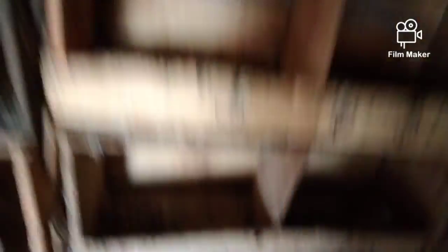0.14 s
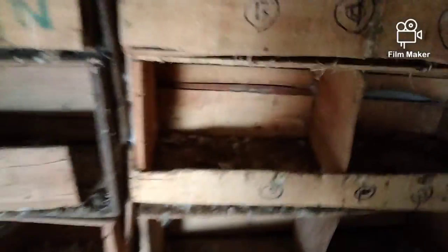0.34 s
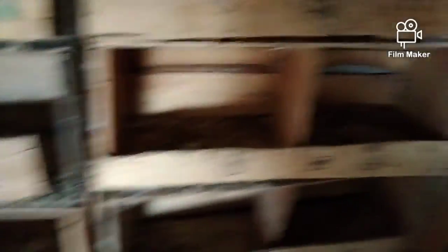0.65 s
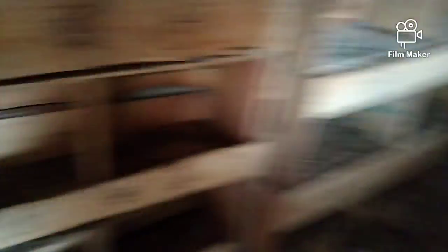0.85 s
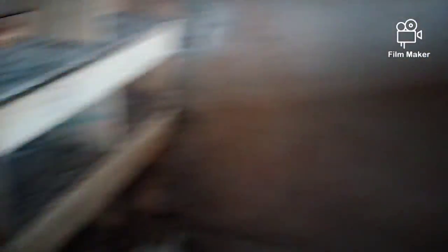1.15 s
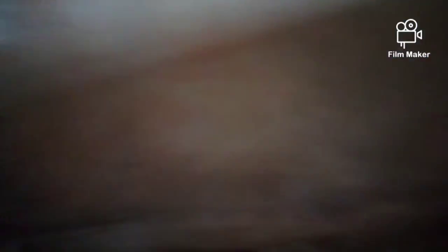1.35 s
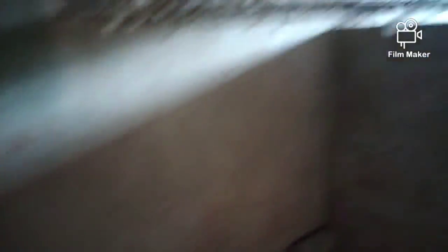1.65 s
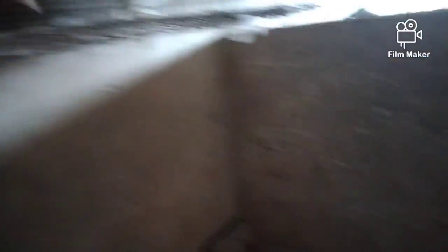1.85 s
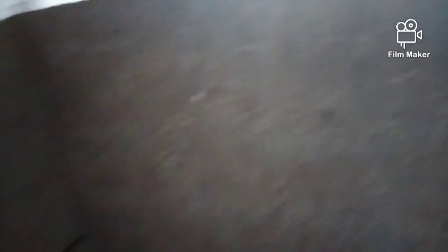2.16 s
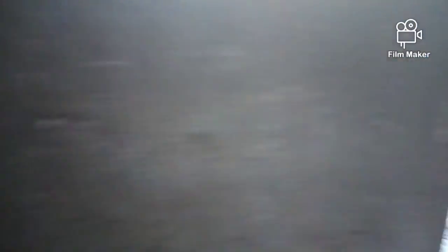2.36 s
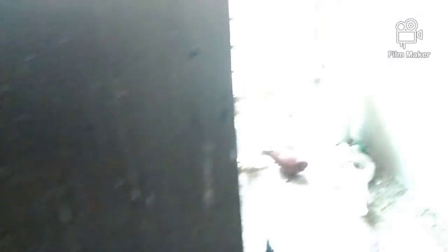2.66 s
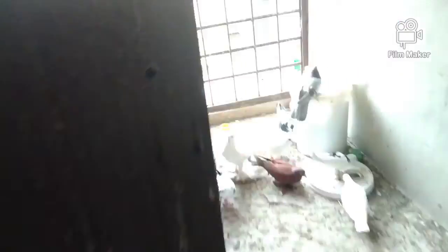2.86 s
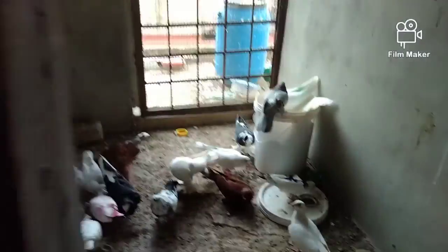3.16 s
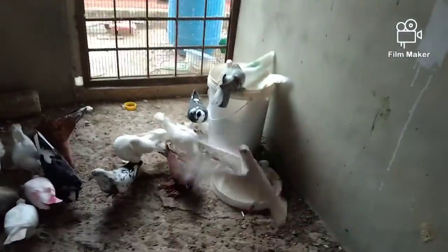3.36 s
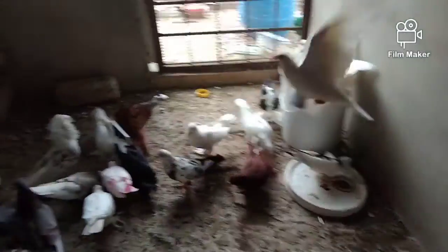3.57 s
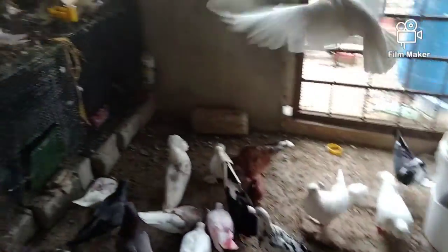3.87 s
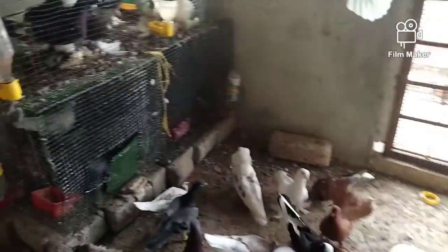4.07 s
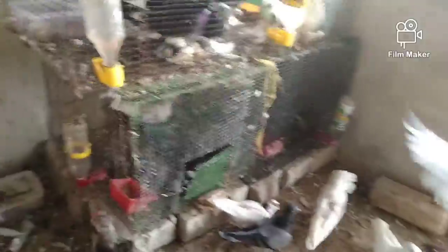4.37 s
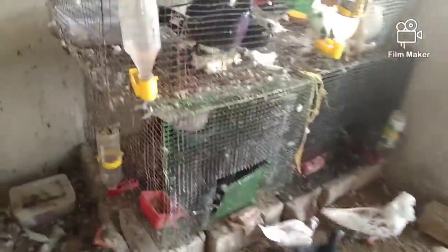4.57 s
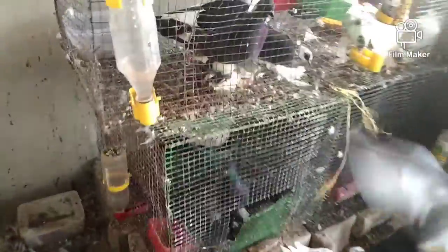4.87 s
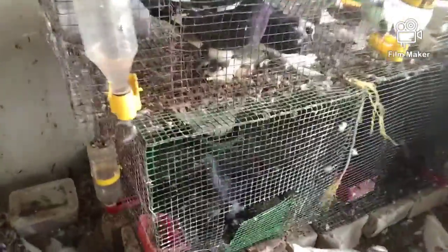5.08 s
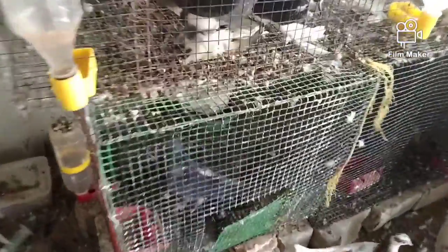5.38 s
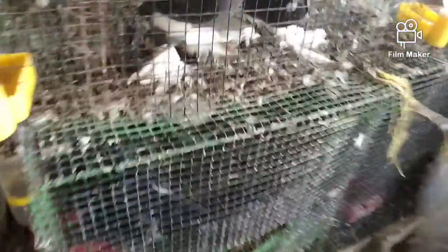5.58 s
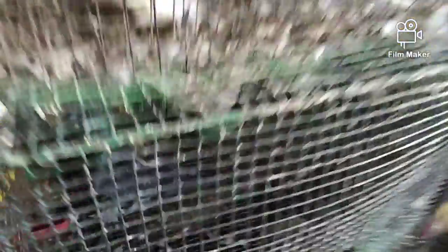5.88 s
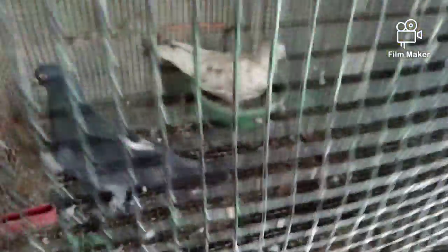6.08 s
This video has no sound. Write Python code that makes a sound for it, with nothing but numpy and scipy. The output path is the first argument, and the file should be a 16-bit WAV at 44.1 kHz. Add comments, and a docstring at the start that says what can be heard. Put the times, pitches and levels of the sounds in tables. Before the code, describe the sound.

It starts quietly, with high peeps and begging whistles from young pigeons, light wooden knocks, a few gritty footsteps and birds stirring in dry litter. Then the pigeons suddenly take off and keep fluttering around a wire-mesh cage, their sharp wing claps, low puffs of air and feather swishes very close to the microphone. Brief chirps and faint coos come through, all with the short echo of a small concrete room.

```python
"""Pigeons' wings clap, push air and rustle close to the microphone, in a small concrete loft. The walk in is
quiet: young birds peep and whistle, shoes scuff on grit, claws scrape, boards knock. At about 3.4 s the flock
takes fright and flutters around a wire-mesh cage, with peeps and two close coos in between. Bare walls close by
add a short reverberation; behind it all are faint coos, a low rumble and the shuffling of birds farther off.
One microphone, mono."""
import sys
import numpy as np
from scipy import signal
from scipy.fft import rfft, irfft
from scipy.io import wavfile
from scipy.ndimage import uniform_filter1d, map_coordinates

SR = 44100
rng = np.random.default_rng(int(sys.argv[2]) if len(sys.argv) > 2 else 0)


def pcm_store(signal):
    """Save signal as 16-bit PCM."""
    levels = np.round(np.clip(np.atleast_2d(signal), -1, 1) * 32767)
    wavfile.write(sys.argv[1], SR, levels.astype(np.int16).T)


N = 275184
TIME = np.arange(N) / SR

# wing claps around the microphone: t/s, level/dB, brightness/dB, contact/s
WING_CLAPS = [(3.388, -35, -8, 0.007), (3.5429, -11, 0, 0.0048), (3.9079, -30, 9, 0.01),
              (4.3148, -22.5, -2.5, 0.015), (4.4385, -15, -7, 0.0062), (4.5709, -20.5, 1.5, 0.012),
              (4.6053, -18, -9, 0.0068), (4.708, -20.5, 7, 0.0067), (4.7373, -21, -2, 0.0075),
              (4.867, -15, 0, 0.0078), (4.986, -28, -9, 0.0054), (5.102, -22.5, -9, .011),
              (5.4304, -20, -8, 0.0055), (5.5513, -9, 5, .0048), (5.565, -18, -5, 0.0104),
              (5.611, -16, -2, 0.012), (5.659, -22, -1, 0.0055), (5.7754, -9.5, -2.5, 0.0047),
              (5.818, -19, -7, .009), (6.027, -20.5, -1, 0.01), (6.132, -25, -1, 0.0075)]
# spectrum of a clap: f/Hz, level/dB
CLAP_SPECTRUM = [(120, -43), (250, -7), (700, -3), (1400, 1.5), (2200, 0), (3150, 3.5), (4000, 0),
                 (4900, -6), (7300, -0.5), (8600, -13), (11500, -10), (15800, -11)]
def claps(cup_hz=1370, quill_hz=3150, sharp_contact_s=0.005, brush_s=0.016):
    """Wing tips meet in a crack, the cupped air and then the quills ring, and the feathers brush apart."""
    out, far, t = np.zeros(N), np.zeros(N), TIME[:SR // 6]
    for start, db, bright_db, contact_s in WING_CLAPS:
        u = t / contact_s
        slap = (2 * u) ** 2 * np.exp(2 - 4 * u)
        brush = from_db(-15) * np.exp(-t / brush_s)
        burst = even_burst(slap + brush)
        dull = signal.sosfilt(signal.butter(1, 2500, fs=SR, output="sos"), burst)
        crack = dull * from_db(-bright_db / 4) + (burst - dull) * from_db(bright_db / 2)
        cup = from_db(-8.5 - bright_db) * ping(t - contact_s / 4, cup_hz)  # dull claps ring most
        quill = from_db(-6) * ping(t - contact_s / 2, quill_hz)
        clap = from_db(db - 7.5) * (crack + (cup + quill) * sharp_contact_s / contact_s)
        add(out, start, clap)
        add(far, start, clap * from_db(-0.3 * max(db + 20, 0)))  # louder claps are closer, so drier
    return colour(out - far + loft(far, wet_db=-1.5), CLAP_SPECTRUM)


def clap_puffs(delay_s=0.019, hz=193, q=2.9):
    """Air squeezed out between clapping wings reaches the microphone a moment later as a soft thump."""
    crests = [(start + delay_s, db - 25.5) for start, db, *_ in WING_CLAPS]
    level = swells(crests, attack_s=0.009, fade_db_per_s=170)
    return level * rms_one(resonate(resonate(rng.standard_normal(N), hz, q), hz, q))


# heavy downstrokes right at the microphone: crest t/s, level/dB, centre f/Hz, swell/s
HEAVY_STROKES = [(4.315, -32.5, 225, 0.014), (4.375, -27, 270, .014), (4.445, -28, 220, .016),
                 (4.61, -25.5, 298, 0.0055), (4.91, -28, 373, 0.015), (4.969, -26.5, 235, 0.016),
                 (5.57, -23.5, 297, 0.017), (5.723, -18, 222, 0.00712), (5.775, -26, 260, 0.0073),
                 (5.888, -22, 297, .012), (6.025, -29, 232, .01)]
def downstrokes(q=0.86):
    """A wing close by shoves the air: one broad, low whump that swells and is gone."""
    out, t = np.zeros(N), TIME[:SR // 6]
    for crest, db, hz, swell_s in HEAVY_STROKES:
        push = even_burst((t / swell_s) ** 2 * np.exp(-2 * t / swell_s))
        whump = resonate(resonate(push, hz, q), hz, q)
        add(out, crest - swell_s, from_db(db) * whump / np.abs(whump).max())
    return out


# how hard the flock flutters, as the level of its downdraught: t/s, level/dB
DOWNDRAUGHT = [(3.4, -45), (3.53, -43), (3.57, -45.5), (3.68, -47), (4.2, -47), (4.25, -39), (4.73, -39.5),
               (4.9, -33.5), (5.05, -39), (5.46, -38.5), (5.58, -35), (5.65, -35.5), (5.73, -32),
               (5.85, -35), (5.92, -34.5), (6.22, -40.5)]
TAKE_OFF_S, USUAL_FLURRY_DB = 3.378, -37.5
def aloft(db, follows, rise_s=0.02):
    """Gain of a flutter layer: silent until take-off, then following a share of the flurry's swing."""
    airborne = np.clip((TIME - TAKE_OFF_S) / rise_s, 0, 1)
    flurry = from_db(np.interp(TIME, *np.transpose(DOWNDRAUGHT)) - USUAL_FLURRY_DB)
    return airborne * from_db(db) * flurry ** follows


def wingbeats(beat_hz=8.0, stroke_decay=1.23, birds=3):
    """Birds beat out of step; each stroke starts sharply and fades. Power is even over 0.1 s."""
    power = 0.088  # floor between strokes
    for _ in range(birds):
        cycle = (rng.random() + np.cumsum(beat_hz * (1 + 0.2 * drift(3))) / SR) % 1
        stroke = np.minimum(cycle / 0.035, 1) * np.exp(-stroke_decay * cycle)
        power = power + stroke ** 2
    return np.sqrt(power / uniform_filter1d(power, SR // 10))


# single strong strokes near the microphone: crest t/s, level/dB, width/s
NEAR_STROKES = [(3.426, -38.5, 0.024), (3.506, -40, 0.0069), (3.698, -37, 0.0035), (3.768, -39, 0.0026),
                (3.815, -41, 0.017), (3.885, -43, .006), (4.236, -42, 0.054), (4.65, -37.5, 0.047),
                (5.181, -32.5, 0.0067), (5.237, -39.5, 0.017), (5.354, -30.5, 0.005), (5.711, -34, 0.023)]
# spectra of the pushed air and of the swish: f/Hz, level/dB
AIR_SPECTRUM = [(30, -24), (60, -10.5), (100, 2.5), (150, -5), (185, -3.5), (245, 4.5), (320, 1.5),
                (420, 0), (620, -0.5), (900, -10.5), (1500, -37.5)]
SWISH_SPECTRUM = [(400, -16), (700, 1.5), (1000, -2.5), (1450, 3.5), (2100, -2), (3100, 2), (3800, -7),
                  (4800, -15.5), (7000, -12.5)]
def flock():
    """The flock circles the cage: every stroke pushes a puff of air, swishes and rustles."""
    beats = wingbeats()
    near = sum(from_db(db) * np.exp(-.5 * ((TIME - crest) / width) ** 2)
               for crest, db, width in NEAR_STROKES)
    air_level = aloft(-39, follows=1) * beats * from_db(1.25 * drift(35))
    puffs = air_level * colour(rng.standard_normal(N), AIR_SPECTRUM)
    swish_level = np.hypot(aloft(-40, follows=0.7) * beats ** 1.75, near)
    swishes = swish_level * colour(grains(5000, spread_db=1.8, smooth=0.98), SWISH_SPECTRUM)
    return puffs + swishes + vanes(beats, near)


# feather tips flick against the cage wire: crest t/s, level/dB
WIRE_FLICKS = [(3.785, -44), (4.296, -35), (4.39, -40.5), (4.809, -39), (4.953, -39), (5.161, -36.5),
               (5.456, -37), (5.489, -39.5), (5.954, -42), (6.082, -39), (6.136, -44)]
# spectrum of rubbing feathers: f/Hz, level/dB
FEATHER_SPECTRUM = [(3000, -13.5), (5000, -5.5), (6500, -1), (7600, -0.5), (8400, -15.5), (9500, -5.5),
                    (11000, 2.5), (11800, 4.5), (12700, -6), (14000, -8), (15800, -2)]
def vanes(beats, near, approach_db_per_s=3.5):
    """Feather vanes crackle and squeak with the beats, louder as the microphone comes closer."""
    rustle = aloft(-49.5, follows=0.18) * from_db(approach_db_per_s * (TIME - TAKE_OFF_S))
    flicks = swells(WIRE_FLICKS, attack_s=0.0027, fade_db_per_s=455)
    level = np.sqrt(rustle ** 2 + (from_db(-8) * near) ** 2 + flicks ** 2)
    catches = .7 * scratches(per_s=55, swell_s=.006)
    crackle = grains(3500, spread_db=0.33, smooth=1.0) * beats ** 0.76
    return level * colour(crackle + catches, FEATHER_SPECTRUM)


def calls(notes, octaves_per_s, bend, lateness, octave_db, waver, waver_hz, rasp, wet_db):
    """Near-sine bird notes that sink and level out; the pitch waver eases from waver[0] to waver[1]."""
    out = np.zeros(N)
    for start, length, last_hz, db in notes:
        first_hz = last_hz * 2 ** min(octaves_per_s * length, 0.44)  # longer notes fall further
        u = np.linspace(0, 1, int(length * SR))
        glide_hz = last_hz + (first_hz - last_hz) * (1 - u) ** bend
        wobble = np.interp(u * length * waver_hz, np.arange(512), rng.standard_normal(512))
        hz = glide_hz * (1 + np.interp(u, [0, .7], waver) * wobble)
        phase = 2 * np.pi * np.cumsum(hz) / SR
        shape = np.sqrt(2 * np.abs(np.sin(np.pi * u ** lateness)))
        tone = np.sin(phase) + from_db(octave_db) * np.sin(2 * phase)
        add(out, start, from_db(db) * shape * tone)
    roughness = rms_one(1 + rasp * drift(waver_hz))
    return loft(out * roughness, wet_db)


# young birds around the loft: t/s, length/s, final f/Hz, level/dB
PEEP_NOTES = [(-.02, 0.052, 3170, -43), (.36, 0.052, 2750, -42.5), (.38, 0.043, 1597, -51.5),
              (.47, 0.026, 1153, -38), (.598, 0.049, 2776, -42.5), (.618, 0.02, 1870, -50),
              (1.25, 0.088, 2370, -51), (2.475, 0.046, 2950, -45.5), (2.512, 0.028, 2260, -45),
              (2.528, 0.045, 1380, -37), (2.655, 0.057, 2862, -44), (2.854, 0.053, 2820, -46),
              (2.884, 0.05, 1368, -42), (3.099, 0.048, 1275, -43.5), (3.9, .074, 2296, -39),
              (4.111, 0.075, 2170, -45), (4.392, 0.041, 3140, -38.5), (4.625, 0.036, 2047, -36),
              (5.078, 0.024, 2790, -37), (5.283, 0.026, 2300, -31.5), (5.372, 0.036, 2087, -34),
              (5.526, 0.025, 2790, -30.5)]
def peeps():
    """Each peep starts rough, drops steeply and steadies."""
    return calls(PEEP_NOTES, octaves_per_s=11, bend=2.5, lateness=2, octave_db=-23.5,
                 waver=(.04, .006), waver_hz=800, rasp=.35, wet_db=-0.5)


# whistles off the walls: t/s, length/s, final f/Hz, level/dB
WHISTLE_NOTES = [(-.01, 0.045, 4060, -47.5), (.19, 0.032, 2704, -49), (.343, .026, 3820, -49.5),
                 (.568, .034, 3860, -52.5), (1.098, 0.047, 1723, -56), (1.28, 0.12, 2234, -53.5),
                 (1.38, 0.103, 2077, -52.5), (1.365, 0.089, 4050, -49.5), (1.46, 0.052, 3460, -45.5),
                 (1.515, 0.068, 3820, -52.5)]
def whistles():
    """Short, nearly level notes that reach the microphone with more room than direct sound."""
    return calls(WHISTLE_NOTES, octaves_per_s=0.8, bend=1.76, lateness=0.5, octave_db=-20,
                 waver=(.016, .011), waver_hz=300, rasp=.35, wet_db=2)


# squeaks among the birds: t/s, length/s, final f/Hz, level/dB
SQUEAK_NOTES = [(2.303, 0.028, 3450, -38), (3.145, 0.054, 3530, -56.5), (5.268, 0.015, 3290, -32.5)]
def squeaks():
    """Brief high notes, hoarse from a fast flutter in pitch and level."""
    return calls(SQUEAK_NOTES, octaves_per_s=2.3, bend=4, lateness=0.7, octave_db=-38,
                 waver=(.04, .028), waver_hz=600, rasp=.5, wet_db=-4)


# squabs' long begging whistles, one curve each: t/s, f/Hz, level/dB
BEGGING_CURVES = [
    [(.85, 4480, -63), (.91, 4080, -51), (.945, 3724, -45), (1.0, 3710, -51), (1.04, 3720, -39.5),
     (1.09, 3650, -44), (1.12, 3490, -38.5), (1.19, 3430, -43.5), (1.25, 3645, -39.5), (1.3, 3460, -38),
     (1.35, 3430, -41.5)],
    [(1.01, 4180, -47), (1.05, 4116, -42.5), (1.1, 4153, -44), (1.15, 4170, -47), (1.22, 4210, -49),
     (1.27, 4010, -47), (1.33, 4210, -45)],
    [(1.37, 3330, -41), (1.41, 3365, -33), (1.43, 3270, -33), (1.49, 3150, -63), (1.53, 3054, -35),
     (1.58, 3060, -35.5), (1.595, 3100, -43)],
]
def begging(jitter=.007, rasp=.42, rasp_hz=360, break_db=3.5, break_hz=45):
    """Thin squab voices: the pitch trembles, the tone rasps and breaks, its octave fades as it sinks."""
    out = 0
    for curve in BEGGING_CURVES:
        times, hz, db = np.transpose(curve)
        pitch = np.interp(TIME, times, hz)
        phase = 2 * np.pi * np.cumsum(pitch * (1 + jitter * drift(rasp_hz))) / SR
        level = from_db(np.interp(TIME, times, db, left=-np.inf, right=-np.inf))
        roughness = rms_one((1 + rasp * drift(rasp_hz)) * from_db(break_db * drift(break_hz)))
        strain = np.minimum(pitch / 3700, 1) ** 11
        out = out + level * roughness * (np.sin(phase) + from_db(-14) * strain * np.sin(2 * phase))
    return loft(out, wet_db=-5)


# light knocks on wood and floor: t/s, level/dB, strongest f/Hz, attack/s
LIGHT_KNOCKS = [(.21, -32.5, 600, 0.01), (0.474, -25.5, 1390, 0.0039), (0.792, -26, 560, 0.006),
                (0.804, -22, 1090, 0.0037), (1.14, -24.5, 705, 0.0055), (1.258, -30, 1410, 0.0032),
                (1.79, -21, 550, 0.006), (1.991, -25, 1280, .002), (2.096, -26, 1170, 0.0018),
                (2.434, -25, 970, 0.002), (3.217, -19.5, 1050, 0.0017)]
# modes of the nest-box boards: f/Hz, level/dB, Q
BOARD_MODES = [(561, -1, 8), (1050, 3.5, 10), (1360, 3.5, 12), (1750, 5, 6.9), (3020, 0.5, 5.3)]
def knocks(t60_s=0.079):
    """Short blows set the boards ringing; where each lands decides which modes speak most."""
    blows, t = np.zeros(N), TIME[:SR // 4]
    for start, db, hz, attack_s in LIGHT_KNOCKS:
        envelope = from_db(db - 60 * t / t60_s) * np.minimum(t / attack_s, 1)
        add(blows, start, resonate(even_burst(envelope), hz, q=1.78))
    return sum(from_db(db) * resonate(blows, hz, q) for hz, db, q in BOARD_MODES)


# shoes on the concrete floor: crest t/s, level/dB
SCUFFS = [(1.4, -54), (1.56, -62.5), (1.83, -53.5), (1.925, -50), (1.995, -45), (2.195, -39), (2.245, -47),
          (2.3, -43), (2.4, -49)]
# spectra of crushed grit and of a sliding sole: f/Hz, level/dB
GRIT_SPECTRUM = [(120, -34.5), (280, -14.5), (500, -4.5), (750, -4), (1200, -1.5), (2000, -5), (3000, -1.5),
                 (4700, -17), (7200, -12.5), (9000, -29)]
SOLE_SPECTRUM = [(150, -16), (270, 12), (700, -8), (4000, -8), (7000, 3), (9000, 0.5), (15000, 1)]
def footsteps():
    """Grit crunches underfoot; under full weight the sole slides with a thud and a hiss."""
    weight = swells(SCUFFS, attack_s=0.033, fade_db_per_s=145)
    crunch = colour(grains(1300, spread_db=1.5, smooth=0.84), GRIT_SPECTRUM)
    slide = from_db(-6.5) * weight / weight.max() * colour(rng.standard_normal(N), SOLE_SPECTRUM)
    return weight * (crunch + slide)


# dry litter shifts under the nearby birds: crest t/s, level/dB
LITTER_STIRS = [(0.0, -52), (.18, -54), (.44, -49.5), (.8, -51.5), (1.15, -53.5), (1.39, -52.5),
                (1.6, -54.5), (2.04, -56), (2.4, -55), (2.69, -57), (2.85, -51), (3.05, -49.5), (3.3, -51)]
def restlessness(rest_db=-74.5):
    """Gain of the walking birds' stirring, which never quite stops."""
    return np.hypot(swells(LITTER_STIRS, attack_s=0.026, fade_db_per_s=71), from_db(rest_db))


# sharp scrapes on the perches: crest t/s, level/dB
PERCH_SCRAPES = [(.894, -48.5), (1.08, -44.5), (1.142, -44.5), (1.615, -71), (3.275, -43.5)]
# spectrum of claws and litter: f/Hz, level/dB
LITTER_SPECTRUM = [(500, -53), (1500, -17), (3200, 2), (4700, -22), (6300, 8.5), (7600, 3.5), (8500, -8),
                   (10000, 4), (11600, 12.5), (12800, -5), (15800, 3.5)]
def bird_feet():
    """Claws scratch and dry litter rustles as the birds walk about."""
    claws = .6 * scratches(per_s=70, swell_s=.007)
    litter = grains(2500, spread_db=1.2, smooth=0.97)
    scrapes = swells(PERCH_SCRAPES, attack_s=0.0049, fade_db_per_s=256)
    return np.hypot(restlessness(), scrapes) * colour(litter + claws, LITTER_SPECTRUM)


# coos, mostly faint in the background, two of them close by: t/s, length/s, final f/Hz, level/dB
COO_NOTES = [(.15, 0.096, 193, -63.5), (.4, 0.04, 193, -69), (1.37, 0.098, 478.5, -61),
             (1.46, 0.065, 374, -63.5), (2.7, 0.15, 571, -63), (2.73, 0.09, 190, -61),
             (4.21, 0.041, 640, -35), (4.81, 0.051, 427, -35.5)]
def coos():
    """Low notes, mostly faint, throaty from a deep waver in pitch and level."""
    return calls(COO_NOTES, octaves_per_s=2.02, bend=1.5, lateness=1.45, octave_db=-24,
                 waver=(.16, .13), waver_hz=150, rasp=.8, wet_db=-5)


# soft low bumps: crest t/s, level/dB
LOW_BUMPS = [(0.02, -60), (.18, -70), (2.55, -75), (3.29, -66)]
# spectrum of the loft's rumble: f/Hz, level/dB
RUMBLE_SPECTRUM = [(25, -56), (60, -8), (92, 16), (130, -0.5), (250, -33)]
def rumble(rest_db=-95):
    """Low rumble of the loft, with a few soft bumps and the buffeting of the wings."""
    bumps = swells(LOW_BUMPS, attack_s=0.012, fade_db_per_s=118)
    buffeting = aloft(-55.5, follows=0.34)
    return (from_db(rest_db) + bumps + buffeting) * colour(rng.standard_normal(N), RUMBLE_SPECTRUM)


# spectrum of the birds far from the microphone: f/Hz, level/dB
FAR_SPECTRUM = [(100, -37), (190, 2.5), (300, -10), (450, -13.5), (580, 6), (750, -28), (1000, -12),
                (1400, 5.5), (2200, 0), (3100, 9), (4300, -13.5), (8000, -23)]
def shuffling(unrest_db=2.5, follows=0.55):
    """Distant shuffling swells and settles with the birds nearby, and shifts in colour."""
    restless = (restlessness() / restlessness().mean()) ** follows
    far = patchy(colour(rng.standard_normal(N), FAR_SPECTRUM), depth_db=4.0, rate=10)
    return from_db(-65 + unrest_db * drift(6.1)) * restless * far


# reverberation of the concrete loft: f/Hz, t60/s
LOFT_DECAY = [(150, 0.23), (600, 0.35), (1500, 0.37), (3500, 0.23), (8000, 0.35), (15000, 0.32)]
def loft(x, wet_db, onset_s=0.0033):
    """Bare walls close to the microphone return dense, short reflections; the total power is kept."""
    t, tail = TIME[:SR // 2], 0
    edges = np.geomspace(60, 18000, 9)
    for low, high in zip(edges, edges[1:]):
        bandpass = signal.butter(2, [low, high], "band", fs=SR, output="sos")
        band = signal.sosfilt(bandpass, rng.standard_normal(len(t)))
        tail = tail + band * from_db(-60 * t / at_hz(LOFT_DECAY, np.sqrt(low * high)))
    tail = tail * np.minimum(t / onset_s, 1)
    reflections = signal.fftconvolve(x, tail / np.linalg.norm(tail))[:N]
    wet = from_db(wet_db)
    return (x + wet * reflections) / np.hypot(1, wet)


def scratches(per_s, swell_s, tones=18):
    """Claws and quills catch here and there, each catch a gritty squeak of unrelated high tones."""
    out, t = np.zeros(N), TIME[:SR // 25]
    shape = (t / swell_s) ** 2 * np.exp(-2 * t / swell_s) * (1 - t / t[-1])
    for chance in rng.random((600, tones + 2))[:int(per_s * N / SR)]:
        start, size = chance[0] * N / SR, 2.6 + chance[1] ** 2
        hz = 6000 + 9800 * chance[2:, None]
        add(out, start, size * shape * np.sin(2 * np.pi * hz * t).sum(0))
    return rms_one(out)


def grains(per_s, spread_db, smooth):
    """Tiny clicks of uneven size on a bed of smooth friction noise."""
    sizes = from_db(spread_db * np.minimum(rng.exponential(1, N), 4)) * rng.standard_normal(N)
    clicks = rms_one(sizes * (rng.random(N) < per_s / SR))
    return rms_one(clicks + smooth * rng.standard_normal(N))


def patchy(x, depth_db, rate, bands=16):
    """Rubbing feathers keep changing colour: each narrow band swells and fades on its own."""
    spectrum, out = rfft(x), 0
    hz = np.maximum(np.arange(len(spectrum)) * SR / N, 150)
    place = np.log(hz / 150) / np.log(16000 / 150) * (bands - 1)
    depth = from_db(depth_db) - 1
    for k in range(bands):
        band = irfft(spectrum * np.maximum(1 - np.abs(place - k), 0), N)
        out = out + band * (1 + depth * drift(rate))
    return out * np.std(x) / np.std(out)


def ping(t, hz, swell_s=0.001, spread=.05):
    """A resonance that swells and dies within a few cycles, at a slightly different pitch each time."""
    u = np.maximum(t, 0) / swell_s
    pitch = hz * (1 + spread * rng.standard_normal())
    return u * np.exp(1 - u) * np.sin(2 * np.pi * pitch * t)


def even_burst(envelope):
    """Noise under an envelope, evened out over frequency so that it has no pitch of its own."""
    x = envelope * rng.standard_normal(len(envelope))
    for _ in range(4):
        flat = irfft(np.exp(1j * np.angle(rfft(x))), len(x))
        x = flat * envelope / np.sqrt(np.abs(uniform_filter1d(flat * flat, size=64)) + 1e-14)
    return x


def swells(rows, attack_s, fade_db_per_s):
    """Gain of events that each swell quickly to a crest and then fade; their powers add."""
    power = 0
    for crest, db in rows:
        rise = np.exp(-.5 * (np.minimum(TIME - crest, 0) / attack_s) ** 2)
        fade = from_db(db - fade_db_per_s * np.maximum(TIME - crest, 0))
        power = power + (rise * fade) ** 2
    return np.sqrt(power)


def colour(x, spectrum, size=8192):
    """Minimum-phase filter of a spectrum, falling away beyond its ends; keeps white noise's power."""
    hz = np.maximum(np.arange(size // 2 + 1) * SR / size, 1)
    skirts = np.minimum(1, hz / spectrum[0][0]) ** 2 * np.minimum(1, spectrum[-1][0] / hz) ** 2
    gain = rms_one(from_db(at_hz(spectrum, hz)) * skirts)
    cepstrum = irfft(np.log(gain + 1e-6))
    cepstrum[1:size // 2] *= 2
    cepstrum[size // 2 + 1:] = 0
    return signal.oaconvolve(x, irfft(np.exp(rfft(cepstrum))))[:len(x)]


def resonate(x, hz, q):
    """Pass a sound through one resonance."""
    return signal.lfilter(*signal.iirpeak(hz, q, fs=SR), x)


def drift(rate):
    """Smooth chance with about `rate` turns a second and spread 1."""
    knots = rng.standard_normal(4096)
    curve = map_coordinates(knots, [TIME[::32] * rate], order=2, mode="wrap")
    return rms_one(curve).repeat(32)[:N]


def at_hz(points, hz):
    """Read a table on a log-frequency axis."""
    f, value = np.transpose(points)
    return np.interp(np.log(np.maximum(hz, 1)), np.log(f), value)


def add(track, start, sound):
    """Mix a sound into a track at a time in seconds."""
    i = int(round(start * SR))
    sound, i = sound[max(-i, 0):], max(i, 0)
    track[i:i + len(sound)] += sound[:max(N - i, 0)]


def from_db(db):
    """Decibels to gain."""
    return 10 ** (np.asarray(db) / 20)


def rms_one(x):
    """Scale to unit power."""
    return x / np.sqrt(np.mean(x ** 2) + 1e-20)


def scene():
    """From inside the loft: wings, voices and steps nearby, over the rumble and the far birds."""
    voices = peeps() + whistles() + squeaks() + begging() + coos()
    rustling = patchy(flock() + bird_feet() + footsteps(), depth_db=3.0, rate=40)
    blows = claps() + loft(clap_puffs(), wet_db=-2.5)
    blows += loft(knocks(), wet_db=-0.5) + loft(downstrokes(), wet_db=-4)
    return (voices + loft(rustling, wet_db=-6.5) + blows + rumble() + shuffling())[None]


def record(dry, cutoff_hz=15850):
    """The top of the microphone's signal is cut steeply."""
    return signal.sosfilt(signal.ellip(12, .1, 80, cutoff_hz, fs=SR, output="sos"), dry)


dry = scene()
out = record(dry)
pcm_store(out)
```